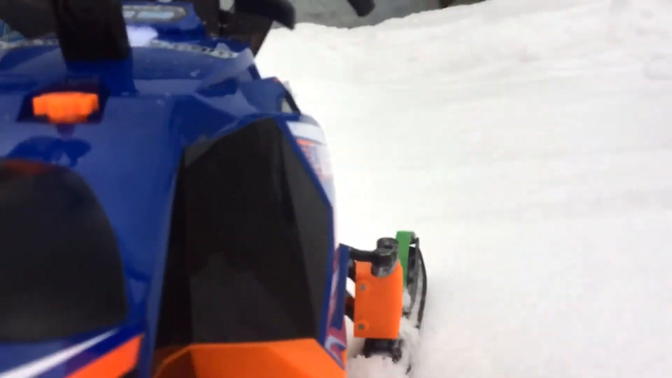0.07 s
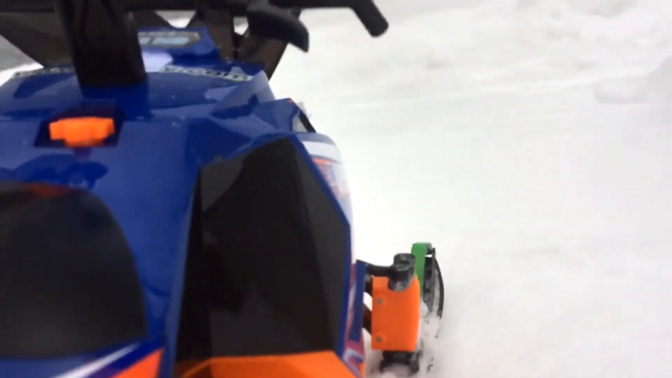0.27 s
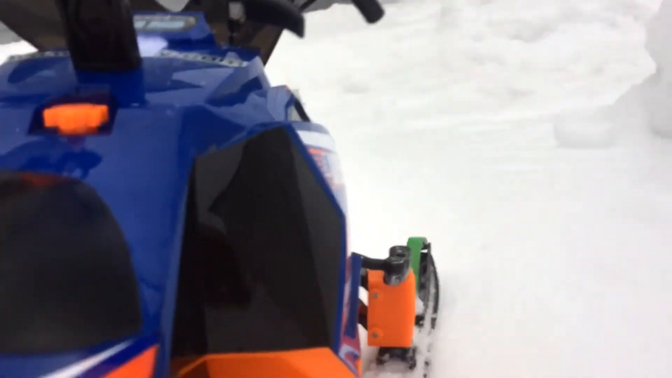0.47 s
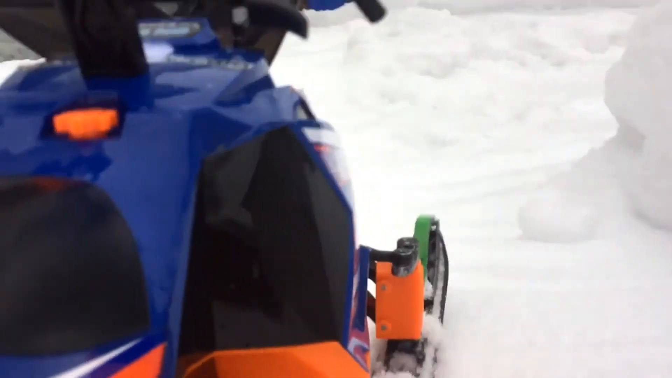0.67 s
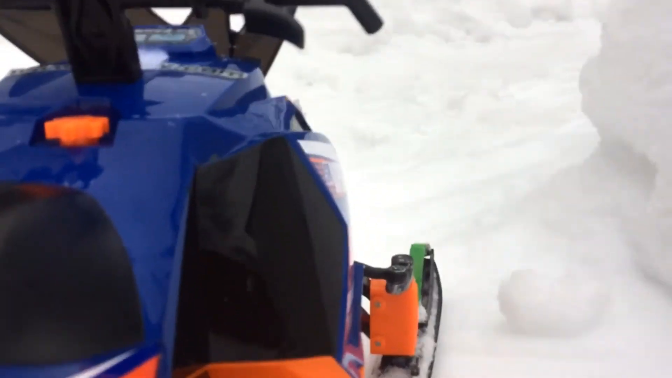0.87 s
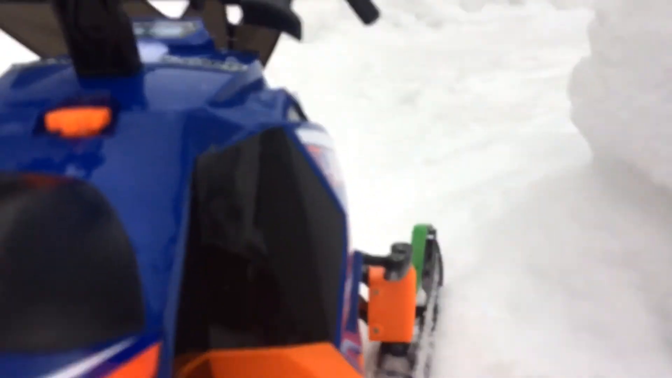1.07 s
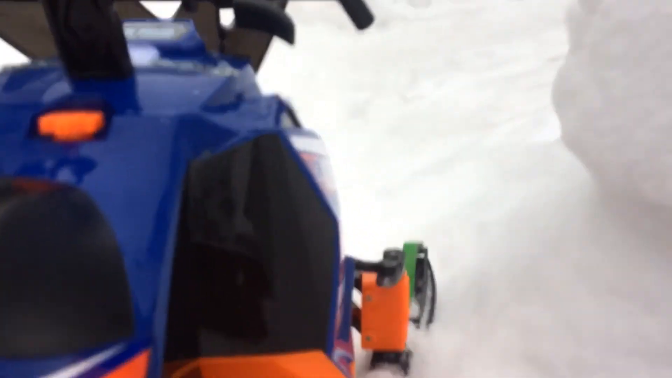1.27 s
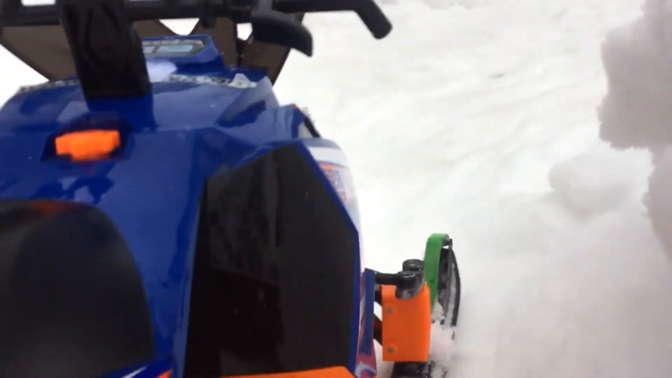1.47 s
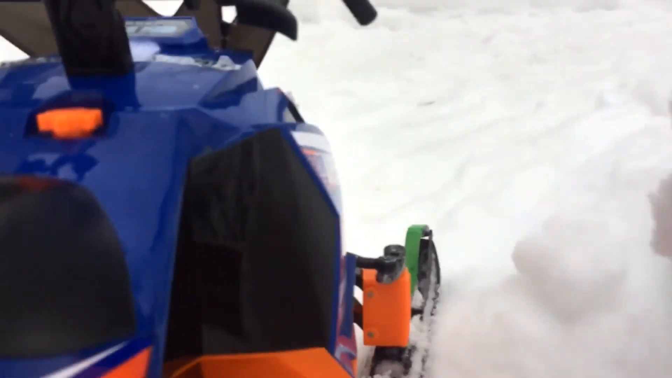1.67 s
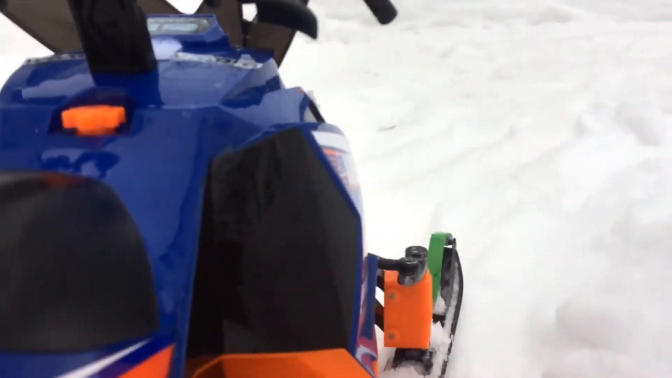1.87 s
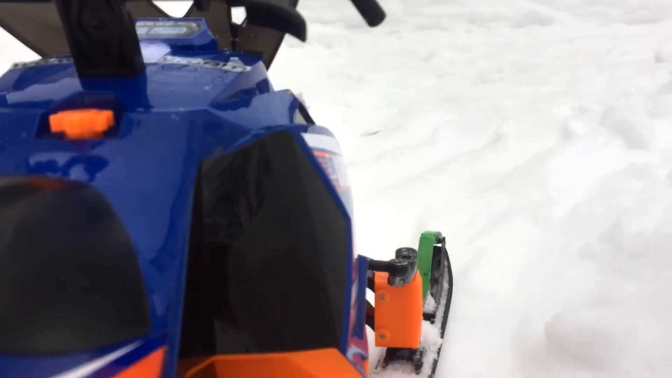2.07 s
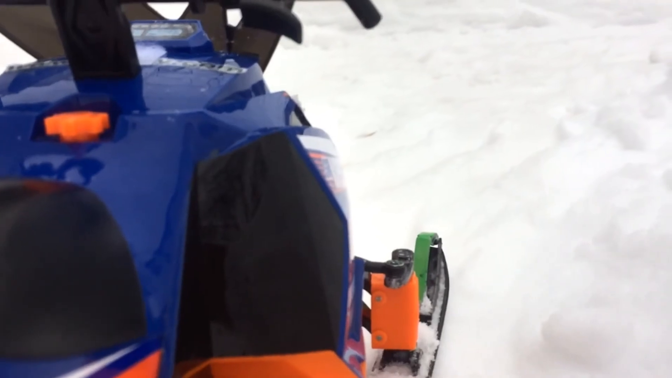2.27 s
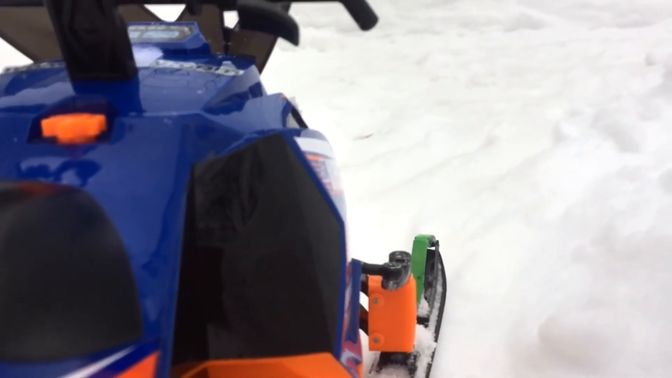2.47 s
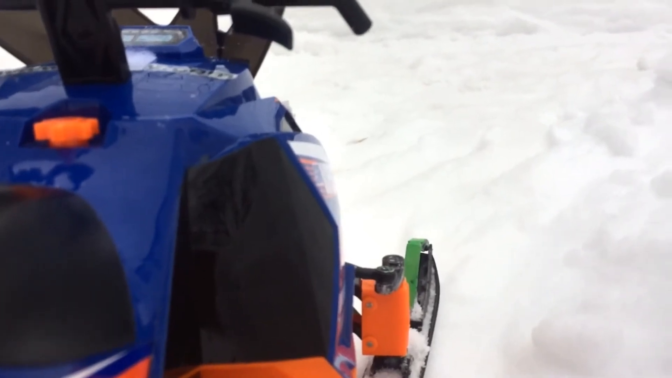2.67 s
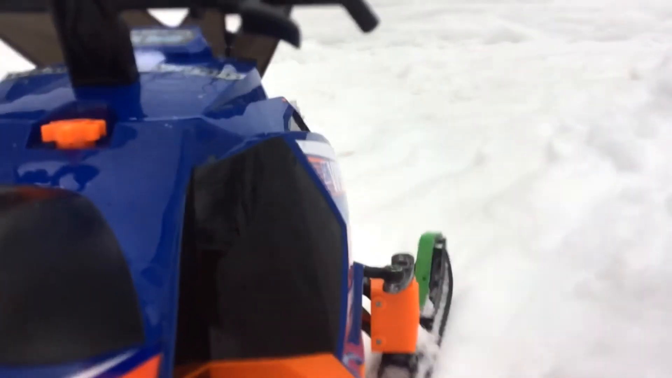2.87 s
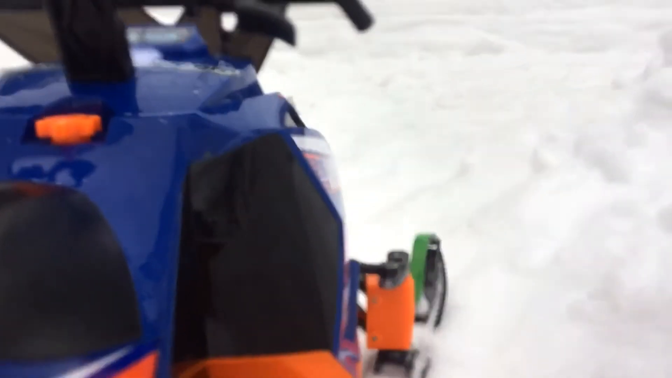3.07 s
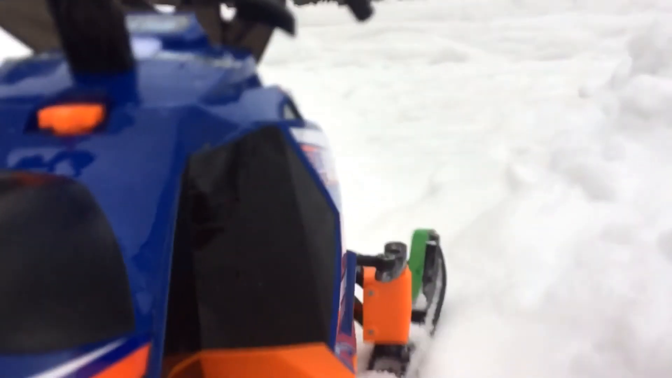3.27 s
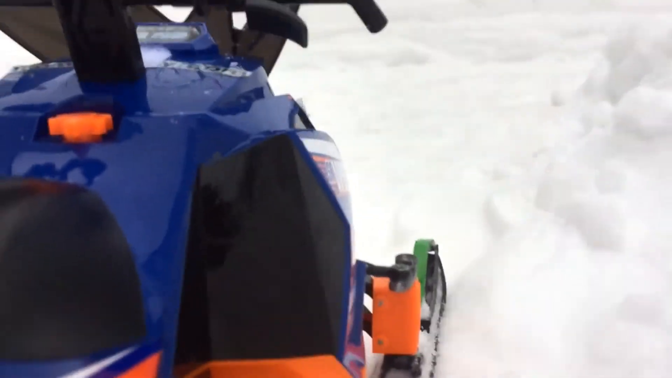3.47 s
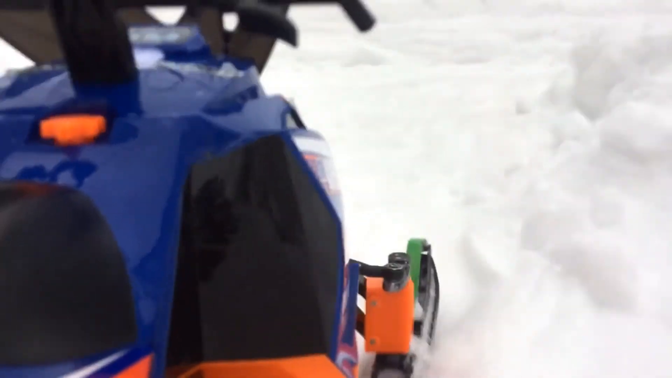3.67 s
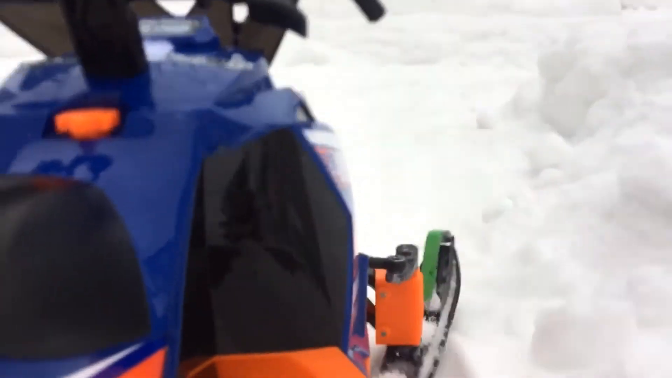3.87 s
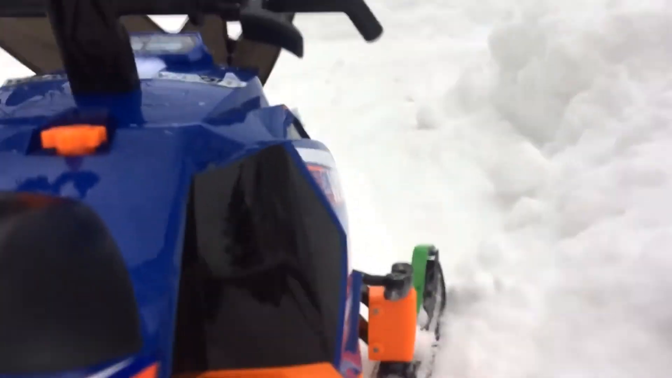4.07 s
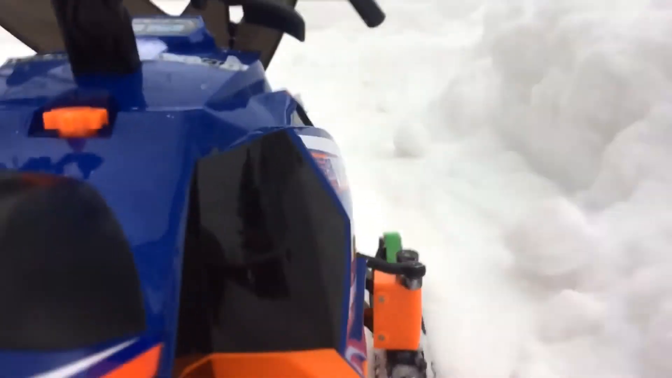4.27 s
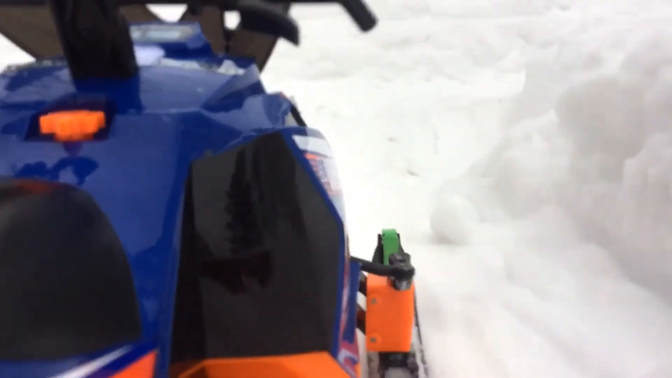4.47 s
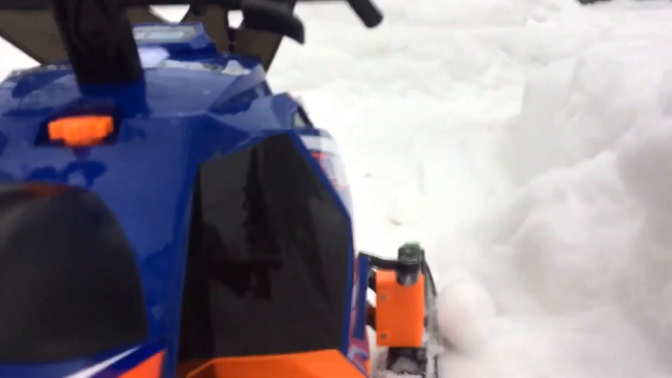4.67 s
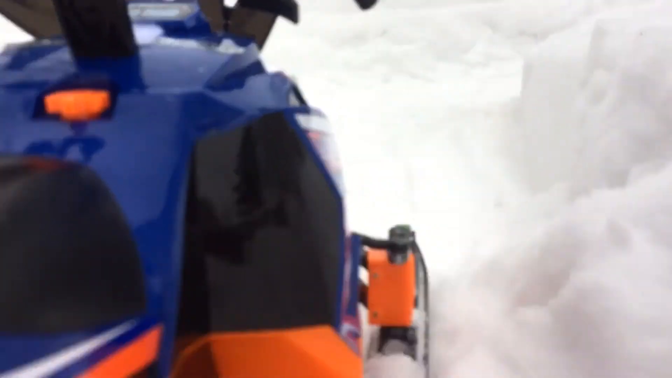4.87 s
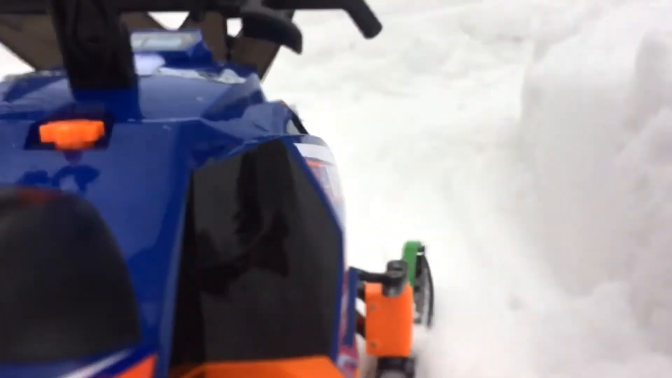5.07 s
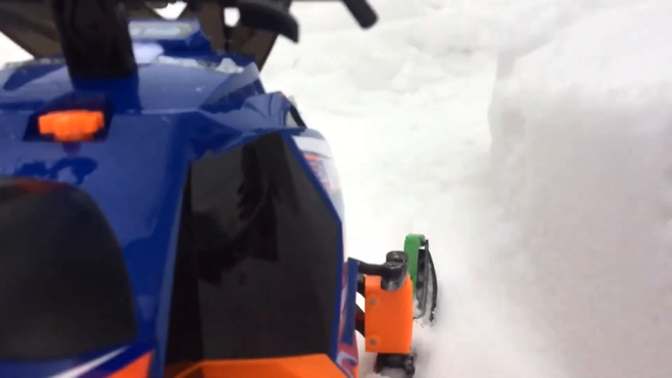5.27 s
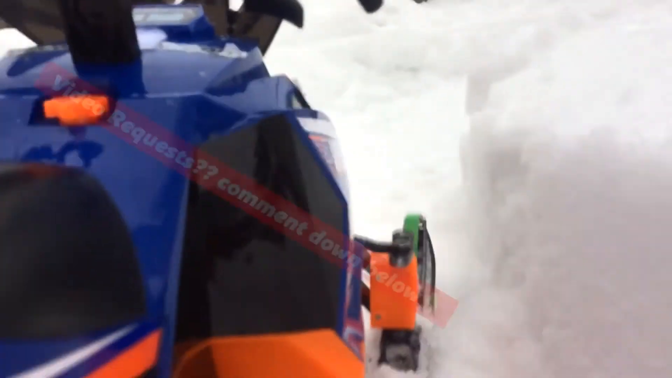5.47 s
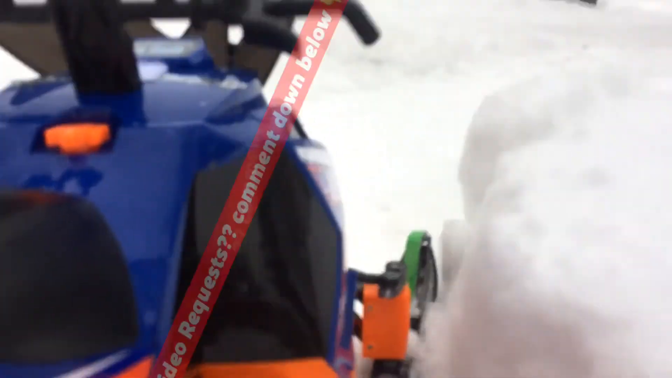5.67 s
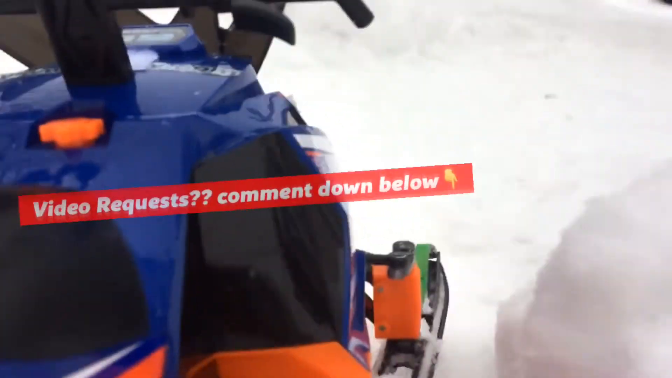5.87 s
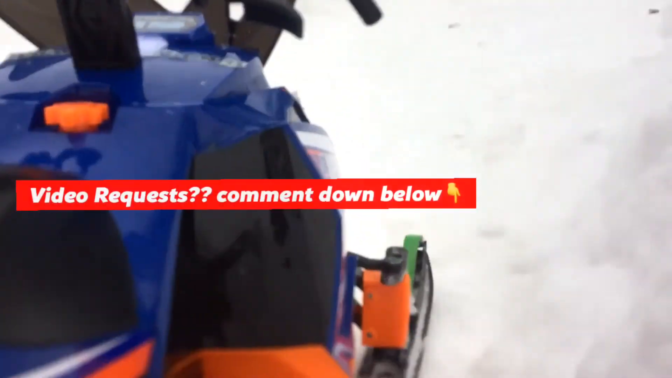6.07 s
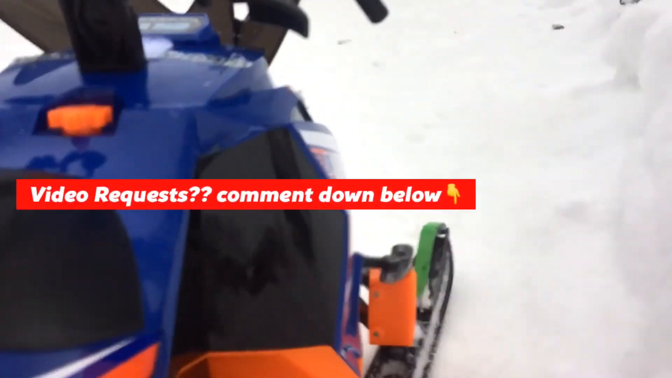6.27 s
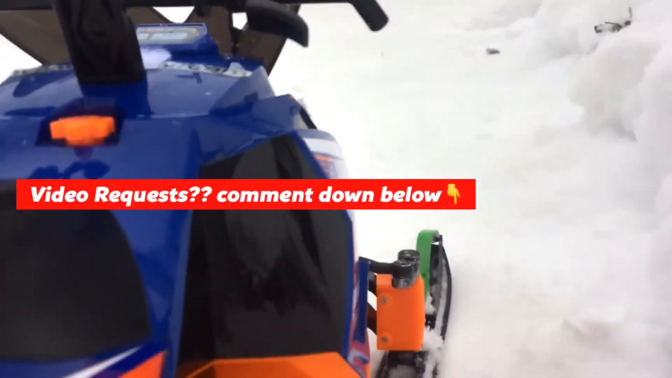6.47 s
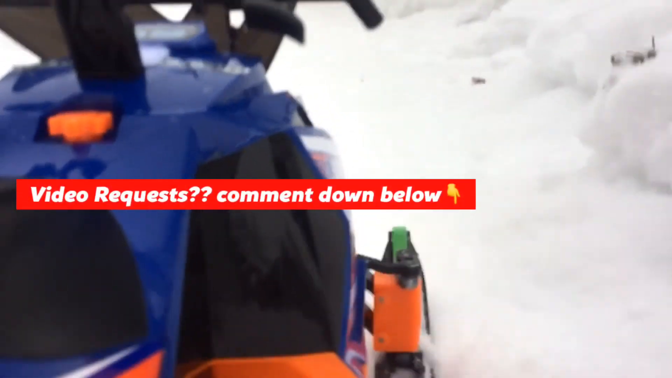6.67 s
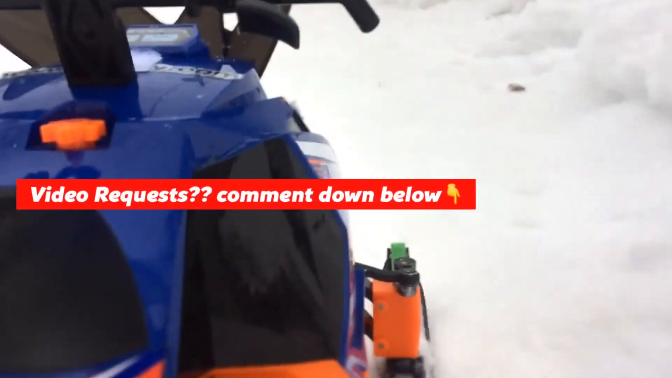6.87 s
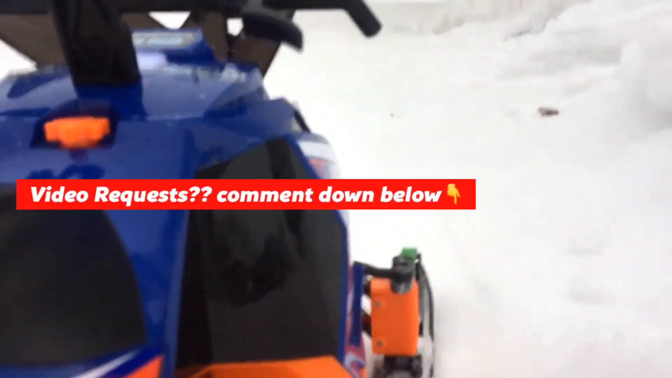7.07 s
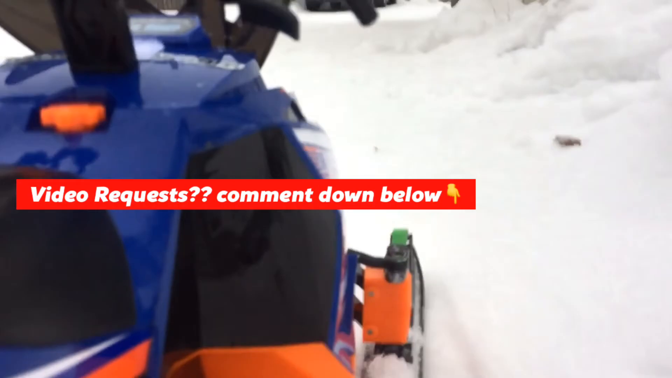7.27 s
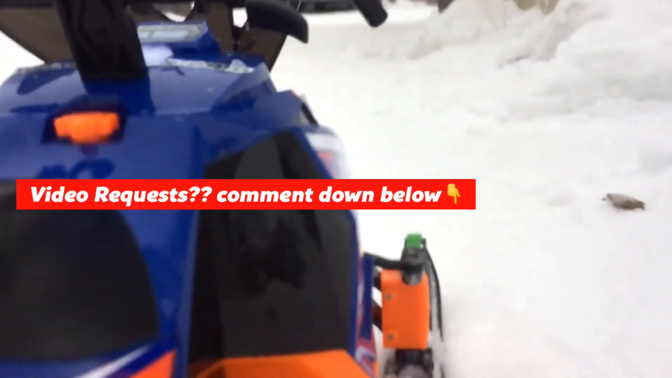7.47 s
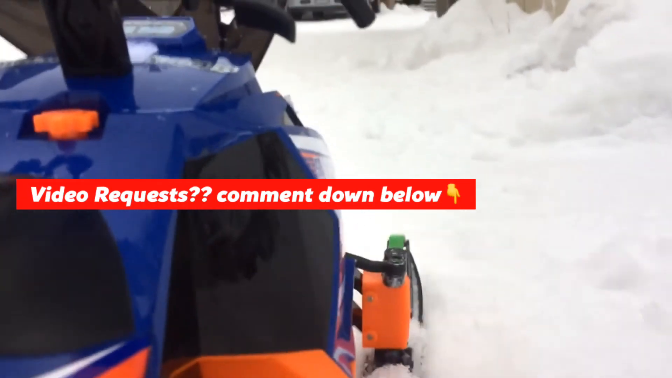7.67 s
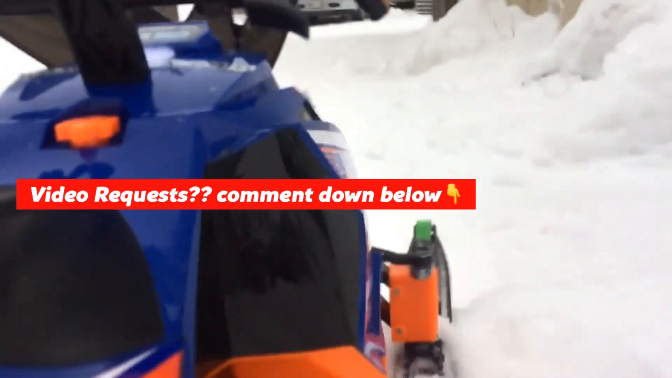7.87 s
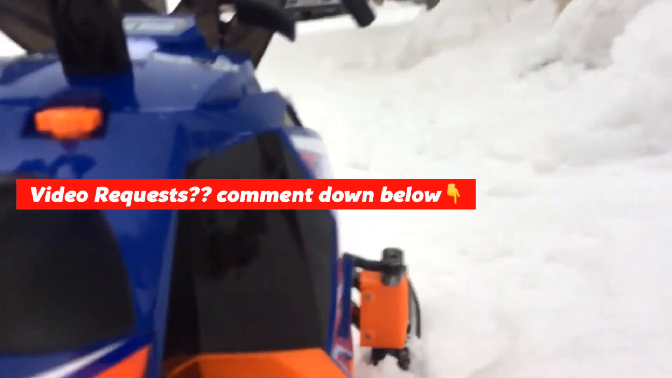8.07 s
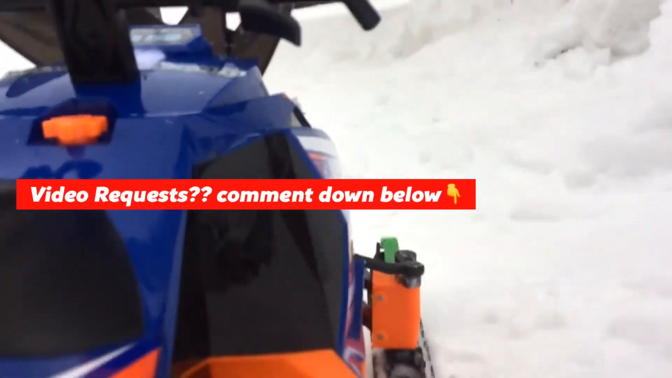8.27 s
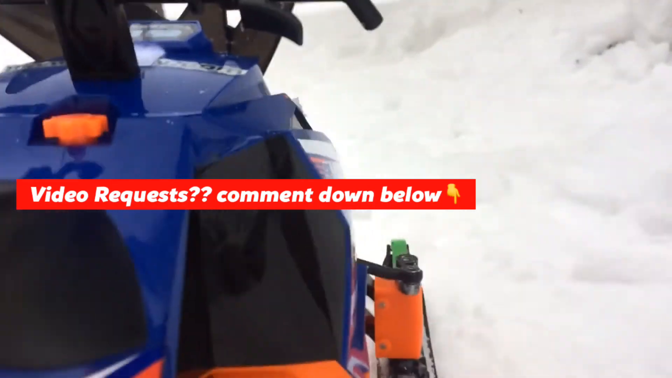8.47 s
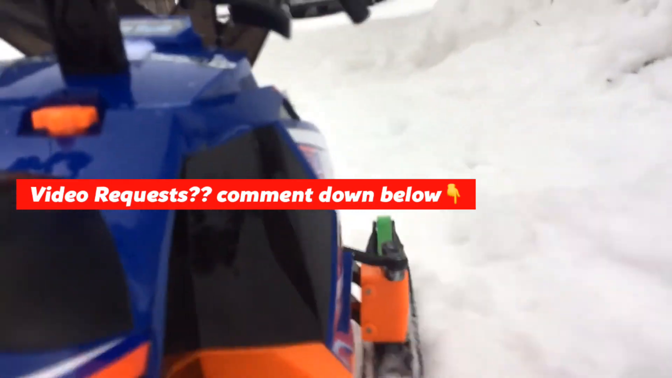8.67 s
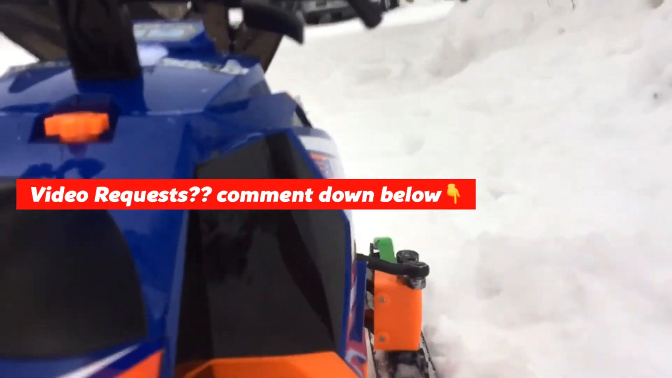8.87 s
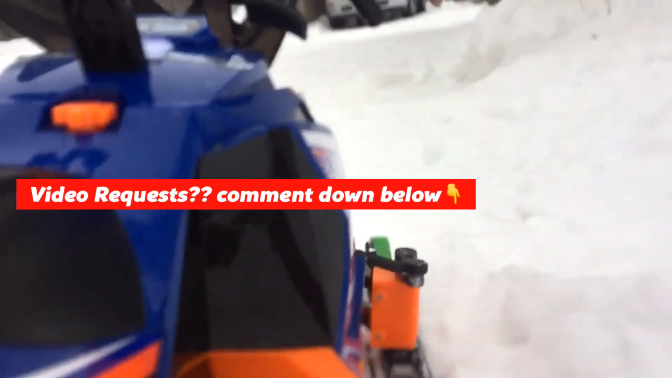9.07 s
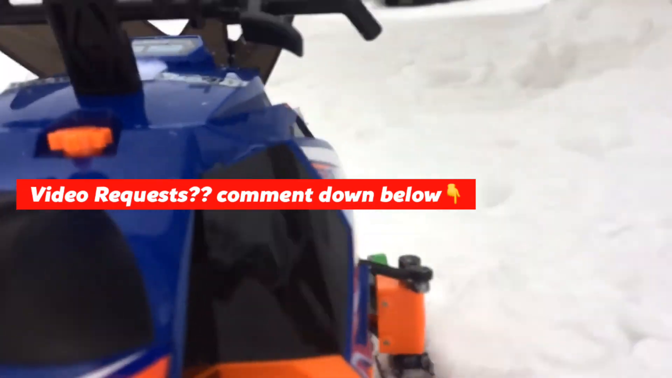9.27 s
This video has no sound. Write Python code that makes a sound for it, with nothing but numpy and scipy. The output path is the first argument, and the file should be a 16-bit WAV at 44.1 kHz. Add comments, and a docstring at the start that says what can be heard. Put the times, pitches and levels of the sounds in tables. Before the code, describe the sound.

A small geared electric motor whines and rattles in short throttle bursts, knocking its plastic shell, nearly stops, then pulls away hard and continues.

```python
"""A radio-controlled snowmobile runs through deep snow in short bursts of throttle, heard from its plastic shell.
After five bursts it nearly falls silent, creeps, then pulls away hard and goes on in bursts to the end.
Gear tones and tooth clicks whine; random track contacts shake resonant filters for the shell and a loose part.
Heavy blows are short noise flurries; bumps bring filtered clicks and a low boom of the chassis on its springs.
Faint filtered noise lies beneath, and the loudest blows overload the microphone."""
import sys
import numpy as np
from scipy import signal
from scipy.fft import rfft, irfft, next_fast_len
from scipy.io import wavfile
from scipy.ndimage import uniform_filter1d, map_coordinates

SR = 44100
rng = np.random.default_rng(int(sys.argv[2]) if len(sys.argv) > 2 else 0)


def wrap_up_sound(samples):
    """Save the sound to the file named by the first command line argument, as 16-bit audio."""
    columns = np.atleast_2d(samples).T
    # keep every value between -1 and 1, then stretch to whole-number steps
    tamed = np.clip(columns, -1, 1)
    steps = np.round(tamed * 32767).astype(np.int16)
    wavfile.write(sys.argv[1], SR, steps)


N = 410571

# machine halts, creeps, pulls away: (time [s], level change [dB])
HALT = [(1.89, -0.5), (2.0, -20), (2.11, -41), (2.28, -44), (2.5, -23), (2.625, -27.5), (2.64, -3)]
# rough ground: (time [s], length [s], relative boom level [dB], relative tick level [dB])
BUMPS = [(0.589, 0.011, -30.5, -25.5), (0.934, .14, -31, -34.5), (1.22, .11, -27, -26),
         (2.677, .145, -25, -21), (3.091, .18, -29, -26), (3.496, .125, -26.5, -25), (3.841, .01, -34, -32),
         (4.161, .01, -30.5, -38.5), (4.801, .04, -35, -35), (5.275, .145, -25.5, -26.5),
         (5.997, .01, -29.5, -28), (6.131, .01, -29.5, -24), (6.224, .01, -30.5, -28.5),
         (6.277, .01, -30.5, -30), (6.567, .01, -29, -30.5), (6.727, .04, -31.5, -24.5),
         (7.053, 0.011, -30, -35), (7.195, .01, -37, -25), (7.746, .01, -30, -27), (8.063, .01, -30.5, -28),
         (8.56, .01, -29, -37.5), (8.879, .19, -29.5, -29)]
# gear case response: (frequency [Hz], level [dB])
GEAR_CASE = [(60, -68.5), (300, -29.5), (900, -18.5), (1150, -6), (1300, -1.5), (1520, 2.5), (1750, 8),
             (2150, -4), (2450, -20), (2800, -12.5), (3500, -3.5), (3850, -24.5), (7000, -23), (8000, -44),
             (16000, -55)]


def amp(db):
    """Decibels to gain."""
    return 10 ** (np.asarray(db) / 20)


def unit(x):
    """Scale to rms 1."""
    return x / np.sqrt(np.mean(x ** 2) + 1e-20)


def steady(x, size=2600):
    """Hold the slow level near rms 1 and keep the fast grain; size in samples."""
    power = uniform_filter1d(uniform_filter1d(x ** 2, size), size // 2)
    return x / np.sqrt(np.abs(power) + 1e-12)


def along(points, hz):
    """(Hz, dB) points as a gain on a log frequency axis."""
    f, db = np.transpose(points)
    return amp(np.interp(np.log(hz + 1), np.log(f + 1), db))


def peaks(modes, hz):
    """Gain of a set of resonances, powers added."""
    return np.sqrt(sum(amp(db) ** 2 / (1 + (2 * (hz - f) / width) ** 2) for f, width, db in modes))


def curves(rows):
    """One value per sample for each column after the time."""
    s, *cols = np.transpose(rows)
    return [np.interp(np.arange(N) / SR, s, c) for c in cols]


def wobble(rate):
    """Smooth random curve, rate knots a second."""
    knots = rng.standard_normal(int(N * rate / SR) + 4)
    return map_coordinates(knots, [np.arange(N) * rate / SR])


def response(gain, size=8192):
    """Minimum-phase impulse response of energy 1 for a gain curve, by folding the cepstrum."""
    cepstrum = irfft(np.log(gain(np.fft.rfftfreq(size, 1 / SR)) + 1e-6))
    cepstrum[1:size // 2] *= 2
    cepstrum[size // 2 + 1:] = 0
    h = irfft(np.exp(rfft(cepstrum)))
    return h / np.linalg.norm(h)


def coloured(points):
    """Impulse response of energy 1 for (Hz, dB) points."""
    return response(lambda hz: along(points, hz))


def through(x, h):
    """Excite a body with impulse response h."""
    return signal.fftconvolve(x, h)[:N]


def strikes(rows):
    """One impulse for each (s, dB) row."""
    s, db = np.transpose(rows)
    return np.bincount(np.round(np.abs(s) * SR).astype(int), amp(db), N)[:N]


def drive():
    """Chatter level, mesh rate and whine level: each squeeze bites, spins up against inertia, then coasts down."""
    # throttle squeezes: (on [s], off [s], relative chatter level at start [dB], at end [dB],
    # while coasting [dB], gear mesh rate aimed for [Hz], relative whine level [dB])
    squeezes = [(0.0, 0.197, -20, -19, -26.5, 750.6, 0.0), (0.349, 0.612, -19, -20, -29.5, 748, 0.0),
                (0.841, 1.013, -12.5, -15, -33.5, 657.5, -4.0),
                (1.156, 1.352, -12.5, -20.5, -32.5, 616.5, -1.0),
                (1.498, 1.624, -19, -18, -34.5, 731, -3.0), (2.628, 2.796, -8, -17.5, -49, 540.0, -3.0),
                (2.947, 3.318, -15, -17.5, -36.5, 689, -8.0),
                (3.446, 4.002, -15.5, -20.0, -38.5, 659, -2.0),
                (4.072, 4.201, -18.0, -19.0, -31, 740.0, -2.0),
                (4.328, 4.487, -17, -18.5, -27, 765.3, -1.0), (4.549, 4.686, -16, -18, -39, 713.4, -2.0),
                (4.751, 5.044, -17, -15.5, -34.5, 729.8, -5.0),
                (5.211, 5.506, -12.0, -17, -29.5, 670.3, -6.0), (5.535, 5.823, -19, -20.5, -36, 798, -1.5),
                (5.946, 6.085, -20.5, -16.5, -26.5, 809.5, -3.0),
                (6.519, 6.789, -8, -18, -32.5, 660.0, -7.0), (6.905, 7.434, -15, -17.0, -30.5, 724.4, -6.0),
                (7.612, 7.798, -13, -14.0, -37, 738.4, -6.0), (7.932, 8.135, -12.5, -15, -40, 786.3, -7.0),
                (8.213, 8.353, -19, -20.5, -37, 597.6, 2.5), (8.455, 8.624, -14, -14, -39.5, 690.0, -4.0),
                (8.812, 9.184, -11.5, -21.5, -40.5, 648.6, -2.5)]
    # track snags, motor sags: (time [s], Gaussian half length [s], mesh rate lost [Hz])
    snags = [(.11, 0.089, 48.07), (0.461, 0.023, 74.9), (.6, .055, 115), (3.891, 0.028, 64.26),
             (4.427, 0.027, 84.8), (5.03, 0.056, 60.14), (5.609, .035, 50.2), (5.761, 0.046, 94.7),
             (6.109, .045, 85.3), (7.063, 0.075, 60.05)]
    attack_s, release_s = .0255, .044
    spin_up_s, coast_s, start_hz = .033, .3, 747.7
    drag_share, drag_per_s = .03, 18  # uneven snow pulls the speed about under load
    free_hz, whine_db_per_hz, strained_db = 689.8, .09, -14  # whine fades below the free speed

    chatter_db = np.full(N, float(squeezes[0][2]))
    mesh_hz = np.full(N, float(start_hz))
    whine_db = np.zeros(N)
    for on, off, start_db, end_db, coast_db, aim_hz, tone_db in squeezes:
        i = max(round(on * SR), 0)
        t = np.arange(min(N - i, 2 * SR)) / SR
        span = slice(i, i + len(t))
        held_s = np.minimum(t, off - on)
        released_s = np.maximum(t - (off - on), 0)
        push_db = np.interp(t, [0, attack_s, off - on], [chatter_db[i], start_db, end_db])
        chatter_db[span] = coast_db + (push_db - coast_db) * np.exp(-released_s / release_s)
        spun_hz = aim_hz + (mesh_hz[i] - aim_hz) * np.exp(-held_s / spin_up_s)
        mesh_hz[span] = spun_hz * np.exp(-released_s / coast_s)
        whine_db[span] = tone_db + (whine_db[i] - tone_db) * np.exp(-t / attack_s)

    shortfall_hz = np.maximum(free_hz - mesh_hz, 0)
    free_db = np.clip(whine_db - whine_db_per_hz * shortfall_hz, strained_db, 0)
    t = np.arange(N) / SR
    sag_hz = sum(lost_hz * np.exp(-((t - s) / half_s) ** 2) for s, half_s, lost_hz in snags)
    drag = 1 + drag_share * (1 - amp(free_db)) * wobble(drag_per_s)
    return chatter_db + curves(HALT)[0], (mesh_hz - sag_hz) * drag, free_db


def track(mesh_hz, chatter_db, ring_db, thump_db, thump_growth):
    """The running track shakes the shell and the loose part; hard shaking also flexes the panels."""
    # low panel flexing: (frequency [Hz], level [dB])
    flex_points = [(20, -62), (60, -25), (120, -15.5), (200, -2), (270, 3.5), (370, -1.5), (650, -11),
                   (2000, -50)]
    force = chatter(mesh_hz, teeth_per_lug=11, contact_rate=600, scatter_db=2.0, slap_db=1.5, grind_db=-3.5)
    panels = spots(through(force, shell()), patchy_db=4)
    body = amp(chatter_db) * steady(panels)
    ring = amp(ring_db - 1.0) * steady(through(force, loose_part()))
    uneven_force = force * amp(8.8 * wobble(35))
    flex = steady(through(uneven_force, coloured(flex_points)), size=5000)
    strain_db = np.maximum(chatter_db + 16, -12)
    return body + ring + amp(chatter_db + thump_db + thump_growth * strain_db) * flex


def chatter(mesh_hz, teeth_per_lug, contact_rate, scatter_db, slap_db, grind_db):
    """Force on the chassis: random contacts and snow grinding, both swelling as each track lug comes round."""
    lug_hz = mesh_hz / teeth_per_lug * np.exp(.25 * wobble(45))
    lugs = np.cumsum(lug_hz) / SR
    slap = amp(slap_db * (np.cos(2 * np.pi * lugs) + 1.26 * wobble(70)))
    contacts = (rng.random(N) < contact_rate / SR) * amp(scatter_db * rng.standard_normal(N))
    return slap * (unit(contacts) + amp(grind_db) * rng.standard_normal(N))


def shell():
    """Impulse response of the plastic shell: broad curve plus panel resonances."""
    # (frequency [Hz], level [dB])
    broad = [(15, -58.5), (40, -36), (100, -6), (280, -7), (420, -1.5), (750, -4), (1100, 0), (1600, 0.5),
             (2150, -5), (2500, -14), (3550, -12), (3850, -19.5), (7100, -37), (7900, -38), (16000, -57.5)]
    # (frequency [Hz], width [Hz], level over the broad curve [dB])
    modes = [(233.7, 21, 17.5), (477.2, 32.3, 11), (648, 31, 4.5), (1153, 24, 4), (1520, 30, -5),
             (3050, 740, 3), (5540, 250, -43)]
    return response(lambda hz: along(broad, hz) * (1 + peaks(modes, hz)))


def loose_part():
    """Impulse response of the loose part: resonances within a band."""
    # (frequency [Hz], level [dB])
    band = [(600, -31), (1500, -11.5), (1800, 12.5), (2050, -1), (2500, -3), (5000, -40.5)]
    # (frequency [Hz], width [Hz], level over the band curve [dB])
    modes = [(1870, 100, -6), (1940, 196, -5.5)]
    return response(lambda hz: along(band, hz) * peaks(modes, hz))


def spots(x, patchy_db, size=5):
    """Contacts land on different spots of the shell: smoothed random gains in time and frequency."""
    z = signal.stft(x, nperseg=512)[2]
    across_bins = uniform_filter1d(rng.standard_normal(z.shape), size - 2, 0)
    field = uniform_filter1d(across_bins, size, 1)
    return signal.istft(z * amp(patchy_db * unit(field)), nperseg=512)[1][:N]


def gears(mesh_hz, chatter_db, free_db, lurch, jitter, flutter_db):
    """Gear tones and tooth buzz sweep through case resonances; load makes the speed lurch and the tones break up."""
    # second gear stage gives the uneven multiples: (multiple of mesh rate, relative level [dB])
    tones = [(1.071, 0), (1.6, -2), (2, -2), (2.142, 0), (3, 2), (4, -1), (5, 2), (6, 0), (10, -2)]
    load = np.clip(1 - amp(free_db), 0, 1)
    rate_hz = mesh_hz * (1 + lurch * load * wobble(28) + jitter * wobble(120))
    turn = 2 * np.pi * np.cumsum(rate_hz) / SR
    whine = np.zeros(N)
    for k, db in tones:
        backlash_rad = (.2 + 1.1 * load) * wobble(220)
        level_db = db + flutter_db * (.5 + 2 * load) * wobble(45)
        whine += along(GEAR_CASE, k * rate_hz) * amp(level_db) * np.sin(k * turn + backlash_rad)
    whine *= amp(chatter_db + .9 * free_db - 1) * rate_hz / 700
    buzz = teeth(rate_hz, spacing_error=.1, timing_jitter=.03, size_db=3, count=14)
    return whine + amp(chatter_db + 0.31 * free_db - 1) * buzz


def teeth(mesh_hz, spacing_error, timing_jitter, size_db, count):
    """One click per gear tooth; uneven teeth repeat each turn and fill in the shaft's multiples."""
    passed = np.cumsum(mesh_hz) / SR
    k = np.arange(int(passed[-1]))
    tooth = k % count
    spacing = spacing_error * rng.standard_normal(count)[tooth]
    offset = spacing + timing_jitter * rng.standard_normal(len(k))  # in teeth
    s = np.interp(k + offset, passed, np.arange(N) / SR)
    db = size_db * (rng.standard_normal(count)[tooth] + rng.standard_normal(len(k)))
    return steady(through(strikes(np.transpose([s, db])), coloured(GEAR_CASE)))


def knocks(bounce_s, ring_db, shell_db):
    """Each heavy track blow is a decaying noise flurry that thumps the shell and rings the loose part."""
    # (time [s], relative peak level [dB], shell thump relative to it [dB])
    blows = [(0.218, -3, -25), (0.282, -5, -27.5), (0.299, -1.5, -22), (0.326, -2, -24), (0.576, 1, -21),
             (0.649, 0.5, -13.5), (0.887, 0.5, -19), (0.995, 3, -17), (1.197, 3.5, -17.5),
             (1.445, -6.5, -25), (1.522, -1, -19), (1.615, -4, -17.5), (1.97, -26, -12), (2.648, -0.5, -19),
             (2.668, 8.5, -16.5), (2.694, 6, -20), (2.706, 3.5, -13), (2.764, 1, -19.5), (2.972, 1.5, -18),
             (3.018, 2.5, -18.5), (3.164, 0, -17.5), (3.288, -1.5, -17.5), (3.314, -2, -22),
             (3.498, 1, -10.5), (4.099, -1.5, -16.5), (4.634, 1, -12), (4.861, 0.5, -17),
             (5.069, 0.5, -23.5), (5.264, 2.5, -16.5), (5.291, 8.5, -17.5), (5.325, 2.5, -19.5),
             (5.37, 0, -17.5), (5.965, -2.5, -30), (6.327, -3, -21), (6.437, -7, -12.5), (6.531, -1.5, -13),
             (6.57, 4, -15.5), (6.739, -1.5, -17), (6.794, -5.5, -12.5), (7.032, 2.5, -11.5),
             (7.627, -6.5, -15), (7.767, 1.5, -12.5), (8.233, 0, -16), (8.829, -1, -16.5),
             (8.881, 5.5, -16)]
    out = np.zeros(N + SR)
    t = np.arange(SR // 20) / SR
    ring, panel = loose_part(), shell()
    for s, db, thump_db in blows:
        flurry = rng.standard_normal(len(t)) * np.exp(-(t / bounce_s) ** 2)
        for body, gain_db in (ring, ring_db), (panel, shell_db + thump_db):
            blow = signal.fftconvolve(flurry, body)
            out[round(s * SR):][:len(blow)] += amp(db + gain_db) * blow / np.abs(blow).max()
    return out[:N]


def ticks(later_db, scatter_db, scatter_s):
    """On rough ground a loose fitting hits its stop once per bounce, with almost no ring."""
    # (frequency [Hz], level [dB])
    colour = [(1500, -35), (3500, 5.5), (6000, 11.5), (9000, -9), (12500, -10.5), (14200, 3.5), (16000, 0)]
    bounce_hz = 58.7
    hits = [(s, db) for s, _, _, db in BUMPS]
    for s, length_s, _, db in BUMPS:
        for k in range(1, 1 + int(abs(length_s) * bounce_hz)):
            late, size = rng.uniform(-1.1, 1, 2)
            hits.append((s + k / bounce_hz + scatter_s * late, db + later_db + scatter_db * size))
    return amp(18.5) * through(strikes(hits), coloured(colour))


def sway(halt_share):
    """The chassis booms on its springs as it rolls, harder over bumps: filtered noise with a varying level."""
    # (frequency [Hz], level [dB])
    springs = [(18, -21), (38, -27), (60, 4), (85, -12), (150, -20.5), (300, -30), (600, -50), (2000, -90)]
    roll_db, fade_s = -35.5, .042  # relative boom on smooth snow; swell and fade at a bump
    t = np.arange(N) / SR
    power = amp(roll_db + halt_share * curves(HALT)[0]) ** 2
    for s, length_s, db, _ in BUMPS:
        outside_s = np.maximum(np.abs(t - s - length_s / 2) - length_s / 2, 0)
        power = power + amp(db) ** 2 * np.exp(-(outside_s / fade_s) ** 2)
    boom = through(rng.standard_normal(N), coloured(springs))
    return amp(0.5) * np.sqrt(power) * steady(boom, size=4400)


def air():
    """Quiet outdoor floor: steady filtered noise."""
    # (frequency [Hz], level [dB])
    floor = [(59, -28.5), (100, 4), (160, -0.5), (583, -28.5), (1550, -25), (1830, -10.5), (2630, -33.5),
             (16000, -40)]
    return amp(-56.5) * unit(through(rng.standard_normal(N), coloured(floor)))


def scene():
    """Sum of all sources at the shell, with no room around it."""
    chatter_db, mesh_hz, free_db = drive()
    ring_db = -0.28 + 0.81 * chatter_db + 1.24 * wobble(30)  # loose part follows the chatter and wanders
    ease_db = 3 * amp(free_db)  # a freely running track rattles less
    rattle = track(mesh_hz, chatter_db - ease_db + 1.5, ring_db - 0.21 * ease_db, thump_db=-9.0, thump_growth=0.3)
    whine = gears(mesh_hz, chatter_db - .3, free_db, lurch=.045, jitter=.004, flutter_db=2.5)
    blows = knocks(bounce_s=0.0096, ring_db=-3, shell_db=6.0)
    clicks = ticks(later_db=-2.5, scatter_db=6.5, scatter_s=0.0011)
    return (rattle + whine + blows + clicks + sway(halt_share=.37) + air())[None]


def record(dry, top=1.0, hardness=7, top_hz=16000):
    """The microphone flattens the highest peaks and keeps nothing above its band limit."""
    clipped = dry / (1 + np.abs(dry / top) ** hardness) ** (1 / hardness)
    m = next_fast_len(N + SR // 2)
    passband = np.fft.rfftfreq(m, 1 / SR) < top_hz
    return irfft(rfft(clipped, m) * passband, m)[:, :N]


dry = scene()
out = record(dry)
wrap_up_sound(out)
```